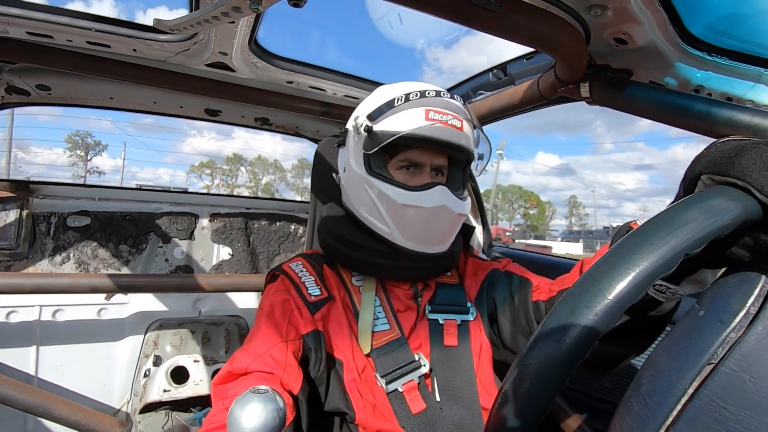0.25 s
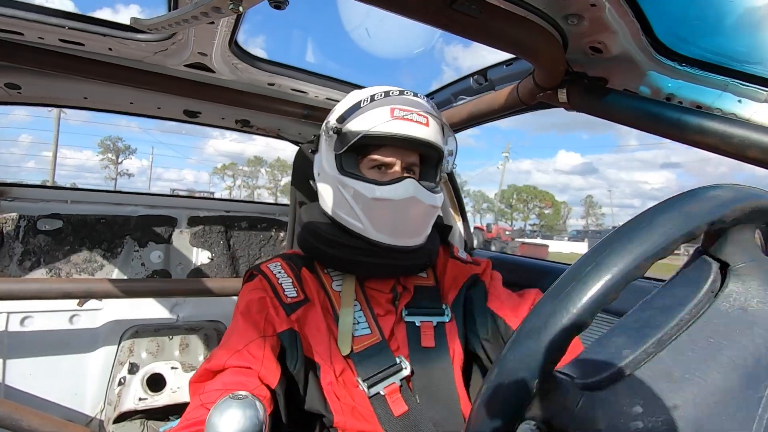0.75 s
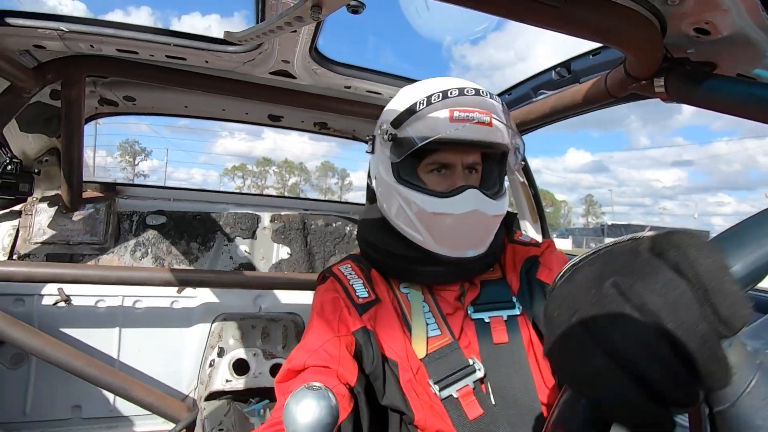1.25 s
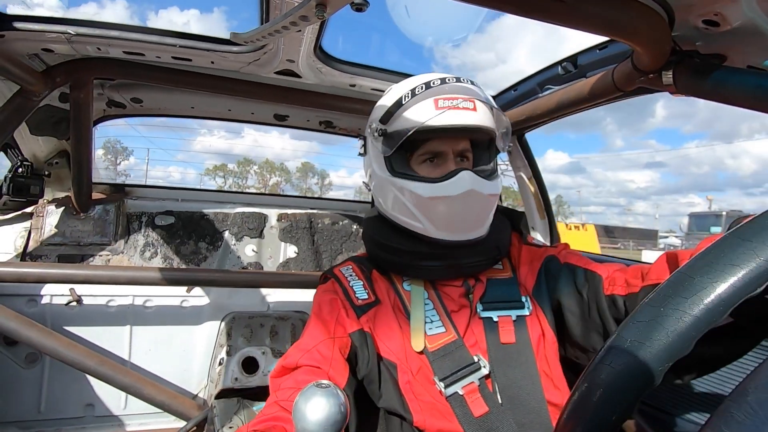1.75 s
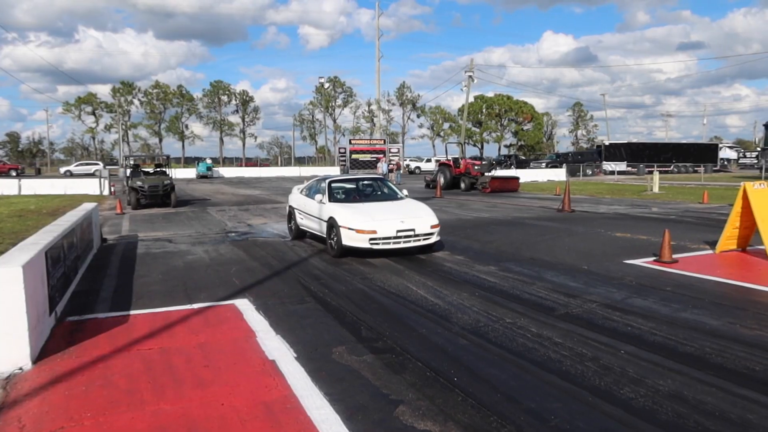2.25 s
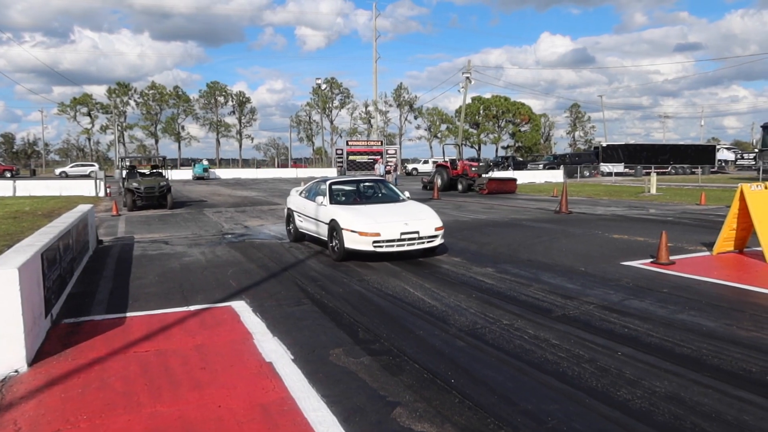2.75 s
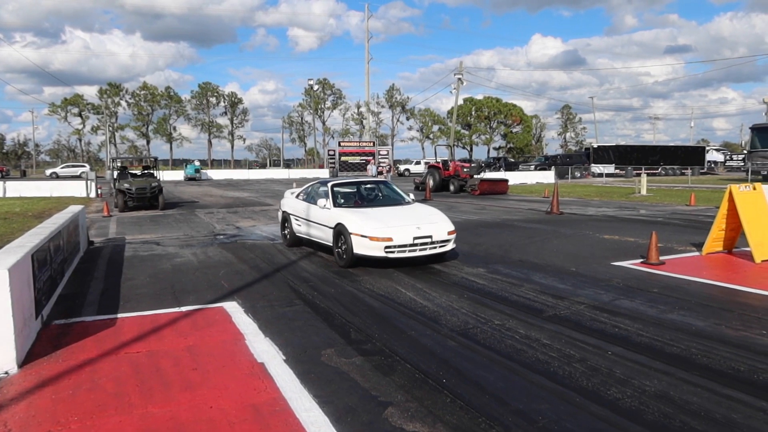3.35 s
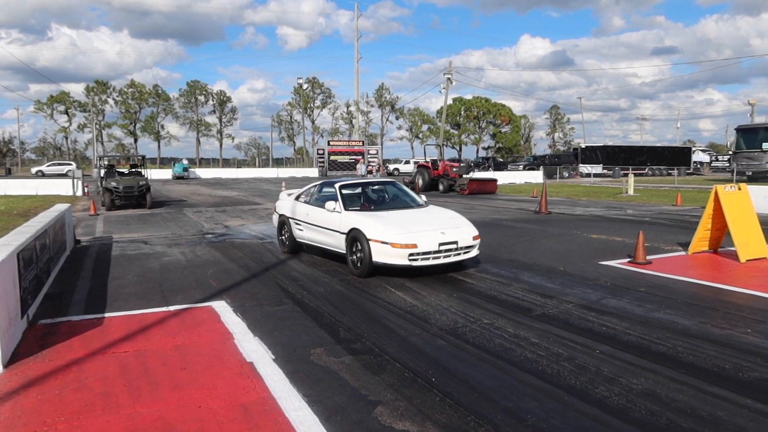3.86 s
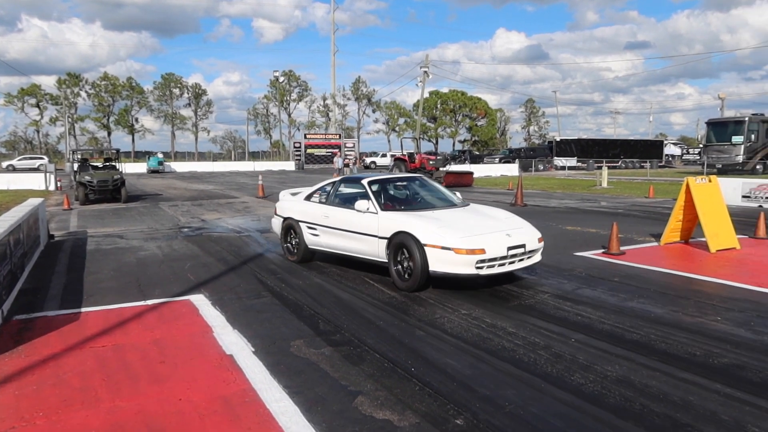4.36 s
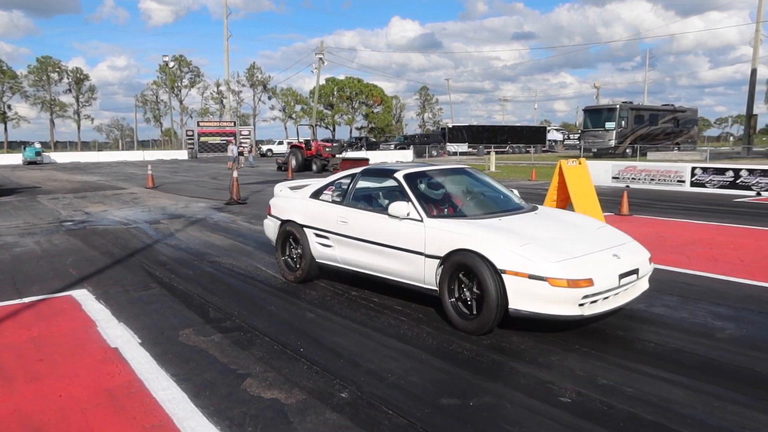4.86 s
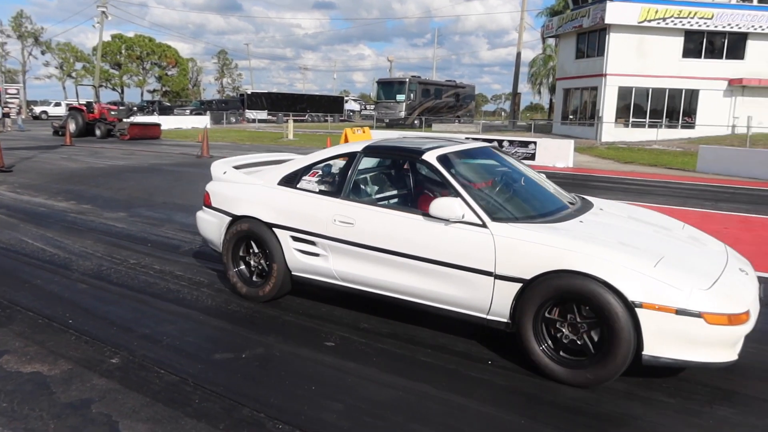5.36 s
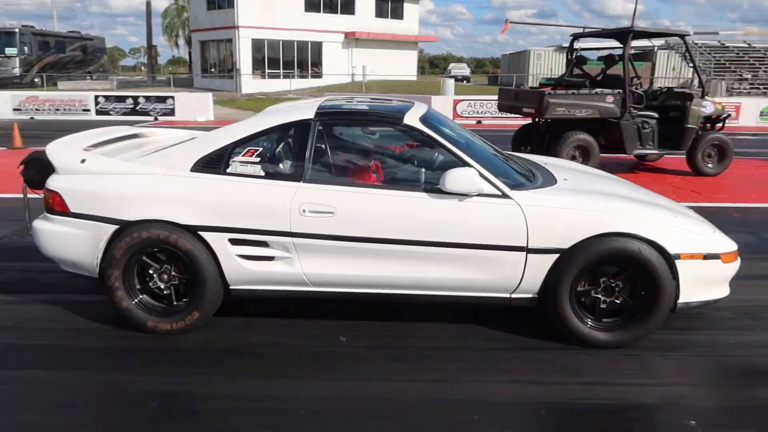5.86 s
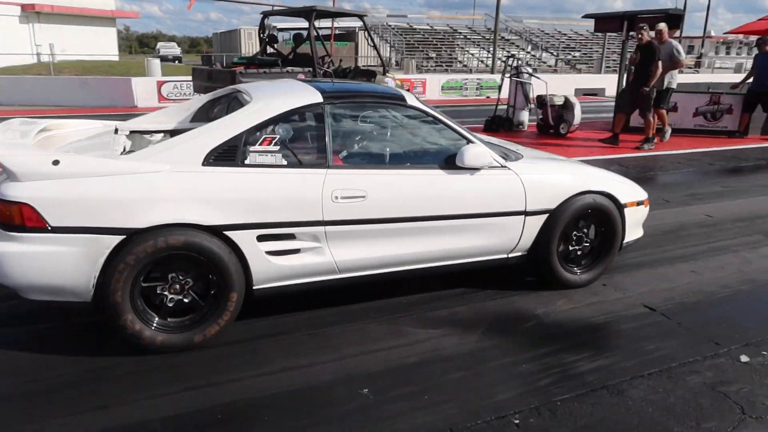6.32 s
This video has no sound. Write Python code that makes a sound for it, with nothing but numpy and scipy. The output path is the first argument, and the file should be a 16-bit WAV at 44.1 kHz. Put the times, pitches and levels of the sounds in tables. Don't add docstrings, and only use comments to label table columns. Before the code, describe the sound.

Inside a bare race car a turbo engine flares and sinks, then trackside it stutters on its limiter, bangs with backfires, surges and idles past.

```python
import sys
import numpy as np
from scipy import signal
from scipy.io import wavfile
from scipy.ndimage import uniform_filter1d

SR = 44100
rng = np.random.default_rng(int(sys.argv[2]) if len(sys.argv) > 2 else 0)


def waveform_to_disk(signal):
    frames = np.transpose(np.atleast_2d(signal))
    scaled = np.clip(frames, -1, 1) * 32767
    samples = np.round(scaled).astype(np.int16)
    wavfile.write(sys.argv[1], SR, samples)


def gain_from_decibels(decibels):
    exponent = np.asarray(decibels, float) / 20
    return 10 ** exponent


N = 290619

CUT_S = 1.925

# (time [s], firing rate [Hz], effort [dB], firing tone [dB])
CABIN = [(0.0, 267.7, -17, -8), (0.1, 314.1, -16.5, -12), (0.2, 329, -16.5, -11), (0.3, 312.4, -17, -11),
         (0.4, 281, -18, -13), (0.47, 233.5, -16.5, -15.5), (0.61, 236.6, -15, -20),
         (0.754, 227.6, -18.5, -7.5), (0.85, 217.9, -19, -7.5), (0.926, 173.2, -19, -12.5),
         (1.0, 140.5, -20, -14), (1.204, 117.4, -20.5, -9), (1.33, 101.9, -21.5, -9),
         (1.488, 85.5, -26, -8.5), (1.612, 68.26, -29, -18), (1.81, 64, -29, -23), (1.92, 65.5, -27.5, -13)]
# (time [s], firing rate [Hz], effort [dB], firing tone [dB])
HOLD = [(1.925, 237, -21, -17.5), (2.4, 237.5, -21, -12), (2.45, 202.2, -23, -12), (2.5, 178.1, -23, -19),
        (2.545, 157, -24.5, -12.5), (2.6, 168.4, -23.5, -20), (2.68, 190.1, -23, -15),
        (2.74, 203.2, -21, -7), (2.8, 218.6, -20.5, -12.5), (2.86, 227.2, -19, -10.5),
        (2.94, 212.8, -22, -11.5), (3.0, 226.9, -19, -12)]
# (time [s], firing rate [Hz], effort [dB], firing tone [dB])
TRACK = [(3.51, 226.7, -18, -9), (3.63, 262.8, -18.5, -12), (3.7, 286, -17, -7),
         (3.83, 334.5, -16.5, -16.5), (3.9, 333.6, -17, -14), (3.96, 315, -21.5, -14),
         (4.025, 290.6, -24.5, -8), (4.05, 277.4, -25.5, -16.5), (4.12, 243.8, -27, -18.5),
         (4.17, 241.2, -24, -14.5), (4.26, 239.1, -22, -16), (4.5, 227, -21, -9)]
# (time [s], firing rate [Hz], effort [dB], firing tone [dB])
COAST = [(4.6, 157.4, -27.5, -20), (4.65, 152.7, -32.5, -25), (4.71, 145.7, -35.5, -15),
         (4.872, 121.2, -38.5, -18.5), (5.1, 88.86, -39, -22), (5.2, 74.57, -42.5, -28),
         (5.5, 67.43, -41, -30), (5.6, 62, -41, -27.5), (5.8, 57.53, -42, -28.5), (5.96, 50.76, -41.5, -26),
         (6.258, 51.82, -40.5, -39), (6.416, 55, -40, -25), (6.59, 58.4, -37, -25)]
# (time [s], level [dB])
RASP = [(0, 2), (.12, 3), (.2, 3), (.3, 5), (.42, 9.5), (.52, -3.5), (.6, -5.5), (.8, -2), (1, -1.5),
        (1.3, -6), (1.9, -5), (2.4, 2), (2.48, -0.5), (2.56, 3), (2.68, 3), (2.78, 1.5), (2.95, -2),
        (3.5, -0.5), (3.62, 0.5), (3.8, -1.5), (3.95, 1), (4.2, -5), (4.6, -1.5), (5.3, -1.5), (6, -2.5),
        (6.59, 3)]
CYLINDERS = [1.4, .1, -.4, -1.1]

# (start [s], length [s], depth [0-1])
LIMITER = [(0.085, 0.024, 0.37), (0.136, 0.077, 0.3), (0.94, 0.11, 0.34), (1.922, 0.51, 0.78),
           (2.857, 0.078, 0.91), (2.989, 0.084, 0.87), (3.095, 0.078, 0.71), (3.218, 0.11, 0.93),
           (3.359, 0.069, 0.78), (3.467, 0.027, 0.97), (3.825, 0.11, 0.43), (4.118, 0.041, 0.57),
           (4.518, 0.087, 0.74), (4.587, .06, 0.38)]
# (centre [s], length [s], change of level [dB])
GAPS = [(1.952, 0.058, -6), (2.068, 0.019, -8), (2.086, 0.011, -15), (2.13, 0.022, -15),
        (2.209, 0.022, -4.5), (2.265, 0.067, -8.5), (2.327, 0.014, -11), (2.4, 0.026, -3),
        (2.52, 0.027, -1), (2.58, 0.019, 1), (2.637, 0.022, -3), (2.718, 0.027, -2.5), (2.803, 0.016, -4),
        (2.891, 0.039, -8.5), (2.942, 0.015, 8.5), (2.985, 0.015, 1), (3.139, 0.057, -7),
        (3.252, 0.031, -8.5), (3.296, 0.049, -3), (3.393, 0.042, -8), (3.481, 0.017, -8.5),
        (3.504, 0.017, -9.5), (3.859, .012, -3), (3.923, 0.011, -8), (1.968, .012, -4)]
# (time [s], peak [dB], brightness [dB])
POPS = [(1.972, -13, -12), (2.008, -12, -1), (2.096, -26, -6), (2.155, -13, -5), (2.214, -16, -8),
        (2.288, -16, -10), (2.334, -15, -5), (2.355, -10, -15), (2.555, -24, -8), (2.708, -13.5, -13),
        (2.757, -26, -10), (2.849, -18, -12), (2.895, -10, -10), (2.919, -11, -13), (3.017, -17, -11),
        (3.059, -4, -17), (3.119, -5.5, -11), (3.154, -19, -1), (3.236, -16, -10), (3.265, -27, -10),
        (3.297, -23, -11), (3.312, -14, -17.5), (3.412, -16, -12), (3.514, -7, -8), (3.519, -0.5, -10),
        (3.575, -6.5, -14), (3.698, -10, -3), (3.789, -11, 0), (3.8655, 6, -5), (3.8952, -10, -1),
        (3.929, -1, -4.5), (3.96, -12.5, 3)]
# (time [s], peak [dB])
THUMPS = [(5.348, -23), (5.557, -26), (5.589, -22), (5.618, -27), (5.849, -19), (5.921, -19), (5.999, -22),
          (6.04, -18.5), (6.19, -19), (6.239, -16), (6.269, -21), (6.309, -22), (6.38, -18), (6.429, -19),
          (6.459, -11.5), (6.499, -20), (6.534, -9.5), (6.569, -17)]

# (frequency [Hz], width [Hz], level [dB])
CABIN_BOOM = [(44.2, 54, -12), (109, 316, -3.5), (174, 130, 2.5), (336, 75, -9.5), (462, 76, -7)]
# (frequency [Hz], width [Hz], level [dB])
PIPE = [(126, 37.3, -1), (227, 31, 1), (365.4, 45, -5), (706, 65, -12), (869, 45, -15), (1420, 62, -17.5)]
# (frequency [Hz], level [dB])
IDLE_PIPE = [(75, -22), (170, 10.5), (200, 9.5), (228, 4.5), (285, -8), (340, -15.5), (400, -1),
             (470, -20.5)]
# (time [s], ring [dB], orders between the firings [dB])
LOPE = [
    (5.2, -2, -3),
    (5.6, -7, -19),
    (5.9, -4.5, -7),
    (6.2, 1, -16),
    (6.4, 2, -5),
    (6.59, 1.5, -8),
]
# (frequency [Hz], level [dB])
CABIN_OCTAVE = [(135, -4), (180, -30), (240, -26), (340, -26), (460, -8), (560, -15.5), (650, -5.5)]
TRACK_OCTAVE = [(105, 9.5), (140, 8.5), (185, -1), (250, -8), (330, 3.5), (385, 6.5), (425, -5.5),
                (475, -9), (620, -2)]
# (frequency [Hz], level [dB])
CABIN_UPPER = [(150, -8), (300, -2), (500, -8), (710, 1), (850, -6), (1000, -7), (1200, -13), (1700, -20),
               (2200, -24)]
TRACK_UPPER = [(150, 1), (220, -2), (270, -9), (330, 2), (420, -20), (550, -21), (750, 3.5), (950, -2.5),
               (1300, -13), (2200, -32)]

# (frequency [Hz], density [dB per Hz])
CABIN_ROAR = [(150, -8), (250, -1.5), (330, -23), (398, -75), (482, 12), (583, -51), (646, -11.5),
              (823, -13), (1250, -12.5), (1990, -17.5), (3220, -18), (9390, -32.5), (15500, -60)]
TRACK_ROAR = [(150, -23), (250, 7), (273, -16.5), (372, 1), (534, -14.5), (705, -1), (1100, -11.5),
              (1410, -7.5), (1640, -15.5), (2160, -13.5), (6770, -36), (13500, -49), (15500, -72)]
IDLE_ROAR = [(200, -30), (380, -5), (500, -14), (620, -11), (760, -4), (930, -2), (1230, -16), (1580, -8),
             (1950, -14), (2800, -12), (4000, -16), (5500, -25), (6500, -23), (12000, -45), (16000, -70)]
# (frequency [Hz], density [dB per Hz])
CABIN_RUMBLE = [(15, -4), (30, 0), (60, -36), (120, -10), (250, -3.5), (500, -115)]
# (frequency [Hz], density [dB per Hz])
CABIN_VENT_COLOUR = [(2650, -5), (4500, -2), (5570, -8.5), (6050, -1.5), (9470, -7.5), (11500, -4.5),
                     (14300, 6), (15600, -46)]
VENT_COLOUR = [(3240, -26), (5500, -9), (6630, -5), (7530, 0), (9360, -2), (10200, -7), (11400, -9),
               (12500, -11), (14200, -14), (15600, -22)]
# (frequency [Hz], likeness [0-1])
CABIN_SAME = [(60, 1), (150, 0.99), (380, 0.56), (950, 0.039), (2380, 0.58), (5980, 0.25), (15000, 0.05)]
TRACK_SAME = [(60, 1), (380, .999), (800, .99), (1400, .993), (3300, .993), (4600, .75), (6000, .7),
              (7200, .92), (9300, .9), (10500, .5), (12500, .3), (15000, .5)]
# (frequency [Hz], left minus right [dB])
CABIN_LEAN = [(60, -0.5), (180, -1), (550, -4.5), (1650, -2), (4970, 0.5), (15000, 2)]
# (time [s], left minus right [dB])
CABIN_PAN = [(0, .1), (.4, 0), (.75, -.8), (1.2, -.4), (1.92, -.5)]

# (start [s], length [s], level [dB], thin top over it [dB])
CABIN_PUFFS = [(0.635, 0.044, -41, -30), (.175, 0.015, -26, -26), (0.335, 0.11, -33, -22),
               (0.589, 0.061, -50, -22), (0.848, 0.307, -30.5, -29), (1.316, 0.12, -31.5, -30)]
TRACK_PUFFS = [(3.46, 0.75, -65, 6), (3.63, .1, -59, 12), (3.798, 0.072, -44.5, -3), (4.019, 0.055, -50, 0),
               (4.106, 0.1, -36, -18), (4.232, 0.022, -31, -22), (4.114, 0.21, -44, -1),
               (4.518, 0.099, -42.5, -3)]
# (frequency [Hz], width [Hz], level [dB])
SPOOL_DOWN = [(774.4, 213, -44), (2973, 860, -39.5), (4130, 326, -48), (6600, 900, -52)]
# (start [s], length [s], frequency [Hz], width [Hz], level [dB])
SWELLS = [(0.37, 0.27, 2900, 430, -31), (0.059, 0.14, 2650, 1100, -39), (0.46, 0.35, 1160, 300, -30),
          (2.0, .45, 71, 50, -38), (2.85, 0.34, 70, 40, -35.5), (2.64, 0.24, 1389, 120, -31.5),
          (2.9, 0.15, 1330, 120, -30.5), (4.66, 0.453, 721, 110, -50), (5.75, 0.29, 830, 168, -58),
          (4.8, .45, 284, 130, -40.5), (5.3, 0.47, 334, 100, -49), (1.08, .35, 336, 110, -35),
          (4.64, 0.49, 9500, 3000, -62), (5.2, .9, 5503, 900, -61), (5.7, .3, 850, 330, -47.5),
          (6.3, .35, 1654, 170, -50)]
# (start [s], length [s], multiple of firing rate [ratio], level [dB])
SIDE_ORDERS = [(.05, .16, 1.5, -34), (.305, .51, .76, -18.5), (.06, .06, 2.0, -25), (.28, .05, 2.0, -27),
               (0, .08, 3.1, -29), (.4, .07, 1.5, -25), (.42, .05, .5, -22), (3.563, .19, .75, -24.5),
               (3.58, .23, 1.5, -29.5), (3.64, .14, 2.5, -29), (3.966, .11, .75, -30), (4.041, .13, 1.5, -25.5),
               (4.39, .12, 3.95, -32), (4.14, .13, 3.0, -30), (4.22, .29, 1.99, -31), (4.2, .08, 1.5, -29)]
# (start [s], length [s], first frequency [Hz], last frequency [Hz],
# level [dB])
DRONES = [(1.25, .15, 226, 208, -18), (1.15, .06, 368, 355, -29), (1.12, .09, 262, 275, -29),
          (1.265, .08, 566, 535, -34), (1.4, .15, 290, 268, -28), (.95, .14, 48, 40, -23),
          (.69, .3, 243, 250, -22.5), (.165, .09, 93, 127, -19), (.13, .083, 155, 175, -18),
          (.63, .24, 480, 520, -28), (.62, .1, 705, 690, -28), (.47, .13, 478, 475, -27),
          (.74, .1, 745, 725, -31), (.9, .04, 490, 485, -27), (1.94, .38, 372, 372, -25),
          (2.0, .38, 237, 237, -26), (2.335, .156, 350, 378, -22.5), (2.6, .11, 352, 378, -23),
          (2.99, .06, 350, 365, -22), (4.36, .15, 282, 270, -26), (4.53, .1, 256, 236, -24),
          (4.71, .17, 350, 300, -33), (5.02, .12, 345, 315, -35), (4.93, .25, 232, 215, -39)]

# (steady [dB], added by cuts [dB], added when slow [dB], added chance when slow)
CABIN_UNEVEN, TRACK_UNEVEN = (-10.5, 13, 5.5, 1.3), (-13.5, 19.5, 16, 0.4)
# (off cam [dB], near idle [dB])
CABIN_SAG, TRACK_SAG = (-5.5, 3.2), (-13, 7.6)
# (level [dB], thin top [dB])
CABIN_LEAK_DB, TRACK_LEAK_DB = (-14.5, -25), (-28, 0)
SPOOLED_S = 3.82
CUT_TONE_DB, CUT_OCTAVE_DB = -12, -11
GAP_ROAR = 0.45
ON_CAM_HZ, OFF_CAM_HZ = 225, 142
LIFT_DB, LIFT_HZ_PER_S = -9, 350
UPPER_DB = -7
IDLE_SMOOTH_DB, IDLE_PULSE = -4.5, 0.2
IDLE_HZ = 80
SUCK_S, SHOVE_S, CRACK_S = 0.001903, 0.00075, 0.003
SPOOL_S, SPOOL_DB_PER_S = 4.6, -16
CABIN_APART, TRACK_APART = 0.44, 0.023
PASS_S, PASS_LAG = 4.0, 0.25


def evened(x):
    return x / np.sqrt(np.mean(x ** 2) + 1e-20)


def read(points, hz):
    f, value = np.transpose(points)
    return np.interp(np.log(hz + 1), np.log(f + 1), value)


def along(rows):
    s, *columns = np.transpose(rows)
    return [np.interp(np.arange(N) / SR, s, c) for c in columns]


def drift(size):
    steps = rng.standard_normal(N // 50 + 2)
    for _ in range(2):
        steps = uniform_filter1d(steps, size=size // 50)
    return np.interp(np.arange(N) / 50, np.arange(len(steps)), evened(steps))


def spans(rows, rise_s, fall_s):
    t, shapes = np.arange(N) / SR, []
    for s, length, *rest in rows:
        end = s + max(length, rise_s)
        shapes.append(np.interp(t, [s, s + rise_s, end, end + fall_s], [0, 1, 1, 0]))
    return shapes


def resonate(x, hz, width):
    return signal.lfilter(*signal.iirpeak(hz, hz / width, SR), x)


def noise(colour, same, lean, patchy_db):
    frames, hz = N // 128 + 5, np.fft.rfftfreq(512, 1 / SR)
    a, b, c, d, patches = rng.standard_normal((frames, 257, 5)).T
    patches = uniform_filter1d(patches, size=5, axis=0)
    patches = evened(uniform_filter1d(patches, size=12, axis=1))
    like = np.clip(read(same, hz), 0, 1)[:, None]
    mid = np.sqrt(1 + like) * (a + 1j * b)
    side = np.sqrt(1 - like) * (c + 1j * d)
    tilt = gain_from_decibels(read(lean, hz) / 2)[:, None]
    z = np.array([(mid + side) * tilt, (mid - side) / tilt])
    z = z * gain_from_decibels(read(colour, hz)[:, None] + patchy_db * patches)
    return evened(signal.istft(z, nperseg=512, noverlap=384)[1][:, :N])


def rumble(cut):
    same, flat = [(20, 0.83), (120, 1.0), (500, 1.0)], [(20, 0), (20000, 0.014)]
    return gain_from_decibels(-26.5 + 36 * cut + 2.4 * drift(size=2500)) * noise(CABIN_RUMBLE, same, flat, 3.7)


def passing_lines():
    t = np.arange(N) / SR
    firing_hz = along(list(CABIN) + list(HOLD)[1:] + list(TRACK) + list(COAST))[0]
    drones = [(s, length, k * firing_hz, db) for s, length, k, db in SIDE_ORDERS]
    for s, length, first, last, db in DRONES:
        drones.append((s, length, np.interp(t, [s, s + length], [first, last]), db))
    out, wobble, flicker = np.zeros(N), drift(size=500), drift(size=900)
    for k, ((s, length, hz, db), fade) in enumerate(zip(drones, spans(drones, 0.03, 0.038))):
        on = fade > 0
        own = np.flatnonzero(on) - 5000 * k
        turns = np.cumsum(hz[on] * (1 + 0.019 * wobble[own])) / SR
        level = np.sqrt(2) * gain_from_decibels(db + 2.2 * flicker[own])
        out[on] += level * fade[on] * np.cos(2 * np.pi * turns)
    return out


def swells():
    air, out = rng.standard_normal((2, N)), np.zeros((2, N))
    for (s, length, hz, width, db), shape in zip(SWELLS, spans(SWELLS, 0.039, 0.06)):
        on = shape > 0
        apart = CABIN_APART if s < CUT_S else TRACK_APART
        mid, side = resonate(resonate(air[:, on], hz, width), hz, width)
        out[:, on] += gain_from_decibels(db) * shape[on] * evened(np.array([mid + apart * side, mid - apart * side]))
    return out * gain_from_decibels(2.5 * drift(size=600))


def turbo():
    since, air = np.arange(N) / SR - SPOOL_S, rng.standard_normal(N)
    bands = sum(gain_from_decibels(db) * evened(resonate(resonate(air, f, w), f, w)) for f, w, db in SPOOL_DOWN)
    return np.clip(since / 0.2, 0, 1) * gain_from_decibels(SPOOL_DB_PER_S * since) * bands


def vented_boost(rows, leak, start_s, puffs, colour, same):
    t, (leak_db, thin_db) = np.arange(N) / SR, leak
    level = gain_from_decibels(along(rows)[1] + leak_db) * np.clip((t - start_s) / 0.18, 0, 1)
    top = level * gain_from_decibels(thin_db)
    for (s, length, db, top_db), shape in zip(puffs, spans(puffs, 0.014, 0.025)):
        level = level + gain_from_decibels(db) * shape
        top = top + gain_from_decibels(db + top_db) * shape
    hiss = noise(colour, same, [(20, 0.00073), (20000, 0.004)], patchy_db=-1.0)
    body = signal.oaconvolve(hiss, signal.firwin(127, 10600, fs=SR)[None], "same")
    thin = hiss - body
    if start_s > 0:
        thin = thin + 0.55 * np.clip((5.4 - t) / 0.8, 0.3, 1) * np.roll(thin, 64, axis=1)
    return level * evened(body) + top * evened(thin)


def valve():
    flutter = gain_from_decibels(1.6 * drift(size=200))
    inside = vented_boost(CABIN, CABIN_LEAK_DB, -1, CABIN_PUFFS, CABIN_VENT_COLOUR, CABIN_SAME)
    rows = list(TRACK) + list(COAST)
    outside = vented_boost(rows, TRACK_LEAK_DB, SPOOLED_S, TRACK_PUFFS, VENT_COLOUR, TRACK_SAME)
    return flutter * np.where(np.arange(N) / SR < CUT_S, inside, outside)


def lope():
    hz, effort_db, tone_db = along(COAST)
    on, (ring_db, odd_db) = hz < IDLE_HZ, along(LOPE)
    angle, out = np.pi * np.cumsum(hz[on]) / SR, np.zeros(N)
    for k in [3, *range(5, 18)]:
        level_db = read(IDLE_PIPE, k * hz[on] / 2)
        level_db = level_db + (ring_db + odd_db * (k % 2) + 3.3 * drift(size=3000))[on]
        out[on] += gain_from_decibels(level_db) * np.cos(k * angle - 0.05 * k * k + 0.087 * k * drift(size=2000)[on])
    return out * gain_from_decibels(effort_db) * np.clip((IDLE_HZ - hz) / 12, 0, 1)


def backfires():
    out, t = np.zeros(N + 4000), np.arange(4000) / SR
    draw = -0.7 * np.sin(np.pi / 2 * t / SUCK_S)
    blow = np.where(t < SUCK_S, draw, np.exp(-(t - SUCK_S) / SHOVE_S))
    ring = sum(resonate(np.diff(blow, prepend=0), f, 2.1 * w) for f, w, db in PIPE[2:])
    ring = ring / abs(ring).max()
    for (s, db, bright_db), hiss in zip(POPS, rng.standard_normal((len(POPS), len(t)))):
        crack = gain_from_decibels(bright_db) * hiss * np.exp(-t / CRACK_S)
        pop = 0.76 * blow + 0.65 * ring + crack
        out[round(s * SR):][:len(t)] += gain_from_decibels(db) * (pop - 0.34 * np.roll(pop, 130))
    push = t / 0.0018 * np.exp(1 - t / 0.0018) * np.cos(2 * np.pi * 150 * t)
    for s, db in THUMPS:
        out[round(s * SR):][:len(t)] += gain_from_decibels(db) * (push + 0.12 * ring)
    return signal.sosfilt(signal.butter(4, 3300, fs=SR, output="sos"), out[:N])


def ignition():
    cut = sum(depth * shape for (s, length, depth), shape in zip(LIMITER, spans(LIMITER, 0.0069, 0.0069)))
    t = np.arange(N) / SR
    gap_db = sum(db * np.clip(1 - abs(2 * (t - s) / length) ** 2, 0, 1) for s, length, db in GAPS)
    return np.clip(cut, 0, 1), gap_db


def firing_strength(firing, chance, scatter):
    luck, swap = rng.standard_normal((N // 100, 2)).T
    dropped = (-1.0) ** (np.arange(len(luck)) + np.cumsum(swap > 1.1)) + scatter * luck
    by_cylinder = evened(np.array(CYLINDERS))[firing % len(CYLINDERS)]
    return np.sqrt(1 - chance) * by_cylinder + np.sqrt(chance) * evened(dropped)[firing]


def pipe_ring(kicks, load, modes):
    soft = uniform_filter1d(uniform_filter1d(kicks, size=110), size=110)
    kicks = load * kicks + (1 - load) * soft
    rung = sum((-1) ** k * gain_from_decibels(db) * resonate(kicks, f, w) for k, (f, w, db) in enumerate(modes))
    rung = signal.sosfilt(signal.butter(2, 0.8 * modes[0][0], "high", fs=SR, output="sos"), rung)
    return rung / np.sqrt(uniform_filter1d(rung ** 2, size=6000) + 1e-12)


def engine(rows, cut, gap_db, sag, uneven, octave, modes, upper, roar, waver, gate, scatter):
    hz, effort_db, tone_db = along(rows)
    slow = np.clip((ON_CAM_HZ - hz) / (ON_CAM_HZ - OFF_CAM_HZ), 0, 1)
    load = np.clip((hz - 62) / 50, 0.05, 1)
    falling = -uniform_filter1d(np.gradient(hz) * SR, size=1500)
    lift = np.clip(falling / LIFT_HZ_PER_S, 0, 1) * np.clip((hz - 196) / 25, 0, 1)
    tone_db = tone_db + CUT_TONE_DB * cut + gap_db + 2 * drift(size=1500)
    overtone_db = effort_db + CUT_OCTAVE_DB * cut + gap_db + LIFT_DB * lift + along(RASP)[0]
    uneven_db = effort_db + uneven[0] + np.maximum(uneven[1] * cut, uneven[2] * slow) + gap_db
    uneven_db = uneven_db + 4.5 + IDLE_SMOOTH_DB * (1 - load)
    roar_db = effort_db + GAP_ROAR * gap_db

    turns = np.cumsum(hz) / SR
    firing = turns.astype(int)
    chance = np.clip(0.2 + uneven[3] * slow + 2 * cut, 0, 0.95)
    strength = firing_strength(firing, chance, scatter)
    angle = 2 * np.pi * turns + waver * load * drift(size=300)
    tone = gain_from_decibels(tone_db) * np.cos(angle)
    lumps = 1 + (0.2 * (1 - load) + 0.3 * load) * np.cos(angle / 2) + 0.18 * load * np.cos(angle / 4)
    for k in range(2, 9):
        level_db = overtone_db + min(2 * k - 1.5, 4.5) * (0.3 + 0.7 * load) * drift(size=1400)
        if k == 2:
            level_db += read(octave, 2 * hz)
        else:
            level_db += read(upper, k * hz) + UPPER_DB + sag[0] * slow + sag[1] * (1 - load)
        breakup = 0.085 * k * (0.6 + 0.4 * load) * drift(size=900)
        tone = tone + gain_from_decibels(level_db) * np.cos(k * angle + k * k / 3 + breakup) * lumps

    kicks = np.diff(firing, prepend=0) * strength / np.sqrt(hz)
    rung = pipe_ring(kicks, load, modes)
    puffs = gain_from_decibels(gate * uniform_filter1d(strength, size=60))
    puffs = puffs * (1 + 0.5 * load * np.exp(-(turns % 1) / 2.0))
    puffs = puffs * (1 + IDLE_PULSE * (1 - load) * np.cos(angle / 2))
    puffs = puffs / np.sqrt(uniform_filter1d(puffs ** 2, size=4000))
    return np.sqrt(2) * tone + gain_from_decibels(uneven_db) * rung + gain_from_decibels(roar_db) * puffs * roar


def cabin_engine(cut, gap_db):
    roar = noise(CABIN_ROAR, CABIN_SAME, CABIN_LEAN, 1.5)
    return engine(CABIN, cut, gap_db, CABIN_SAG, CABIN_UNEVEN, CABIN_OCTAVE, CABIN_BOOM, CABIN_UPPER,
                  roar, waver=0.065, gate=0.12, scatter=1.15)


def trackside_engine(cut, gap_db):
    flat = [(20, 0), (20000, 0.014)]
    coasting = np.clip((np.arange(N) / SR - 4.5) / 0.2, 0, 1)
    roar = np.sqrt(1 - coasting) * noise(TRACK_ROAR, TRACK_SAME, flat, 1.0)
    roar = roar + np.sqrt(coasting) * noise(IDLE_ROAR, TRACK_SAME, flat, 1.0)
    rows = list(HOLD) + list(TRACK) + list(COAST)
    return engine(rows, cut, gap_db, TRACK_SAG, TRACK_UNEVEN, TRACK_OCTAVE, PIPE, TRACK_UPPER,
                  roar, waver=0.14, gate=0.23, scatter=0.8)


def scene():
    t = np.arange(N) / SR
    cut, gap_db = ignition()
    inside = rumble(cut) + cabin_engine(cut, gap_db)
    outside = lope() + backfires() + trackside_engine(cut, gap_db)
    outside = signal.sosfilt(signal.butter(2, 45, "high", fs=SR, output="sos"), outside)
    moved = np.clip((t - CUT_S) / 0.0056, 0, 1)
    air = swells() + turbo() + valve()
    left, right = (1 - moved) * inside + moved * outside + air + gain_from_decibels(gap_db) * passing_lines()
    late = PASS_LAG * np.clip(t - PASS_S + 0.5, 0, 1)
    right = (1 - late) * right + late * np.roll(right, 1)
    lean = gain_from_decibels((1 - moved) * along(CABIN_PAN)[0] / 2)
    return np.array([left * lean, right / lean])


def band_limit(x):
    return signal.sosfilt(signal.butter(12, 15770, fs=SR, output="sos"), x)


def record(dry):
    mix = 1.206 * np.tanh(dry / 1.623)
    return band_limit(mix)


dry = scene()
out = record(dry)
waveform_to_disk(out)
```